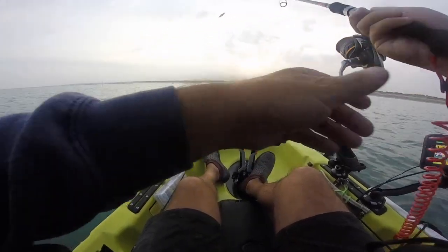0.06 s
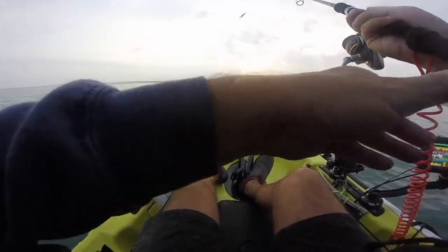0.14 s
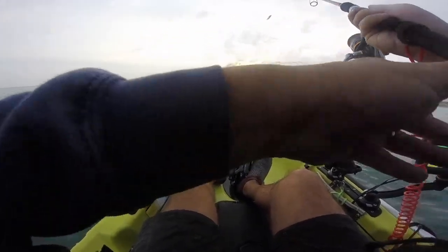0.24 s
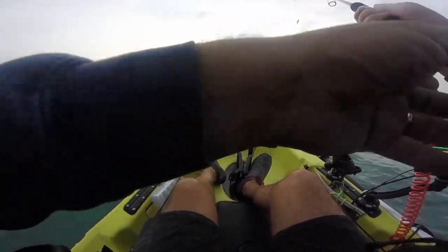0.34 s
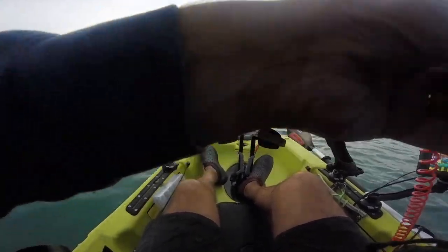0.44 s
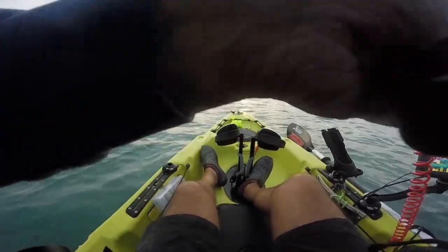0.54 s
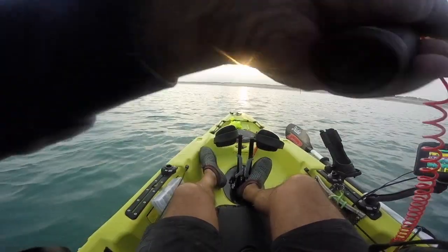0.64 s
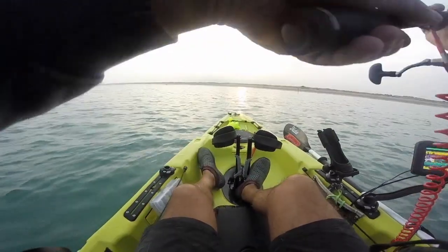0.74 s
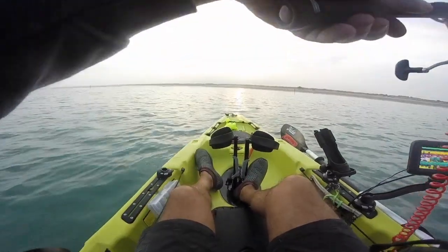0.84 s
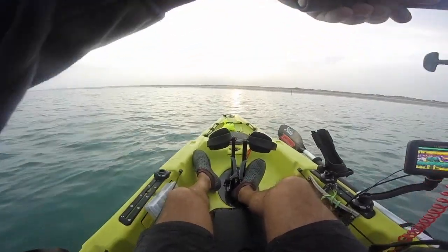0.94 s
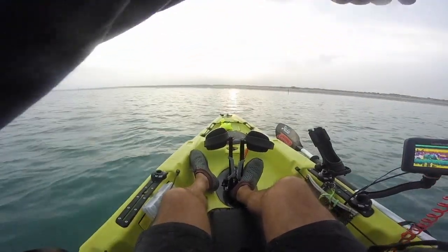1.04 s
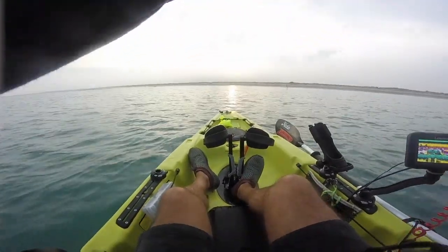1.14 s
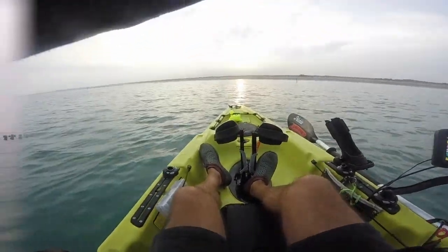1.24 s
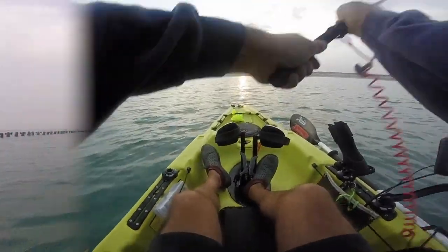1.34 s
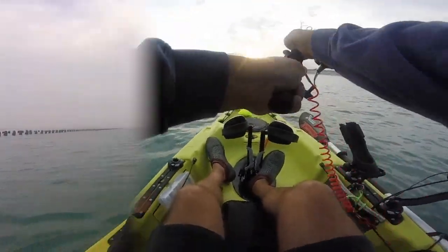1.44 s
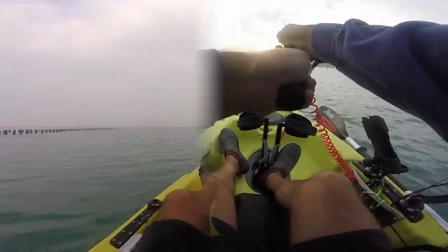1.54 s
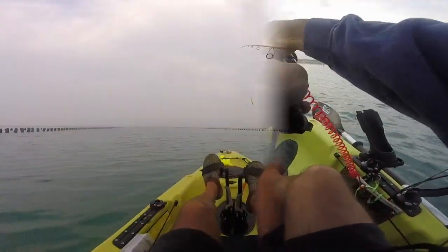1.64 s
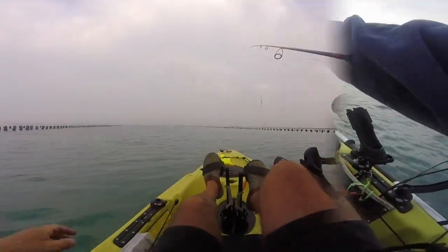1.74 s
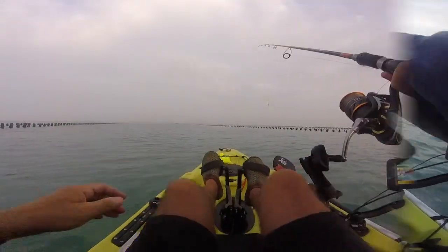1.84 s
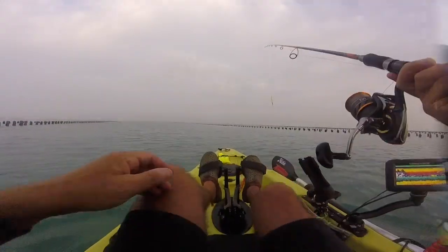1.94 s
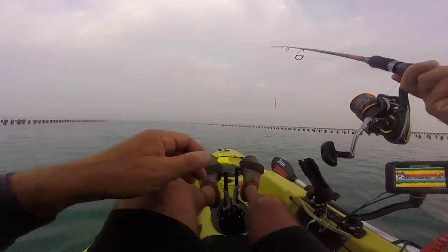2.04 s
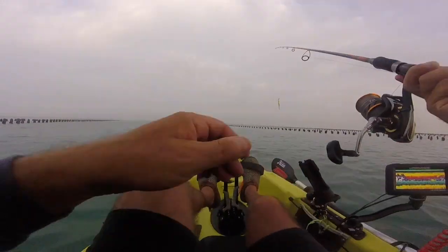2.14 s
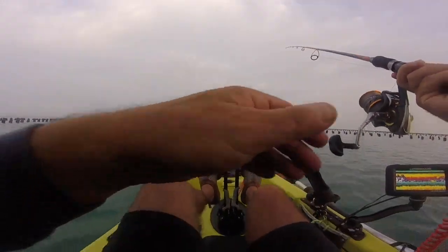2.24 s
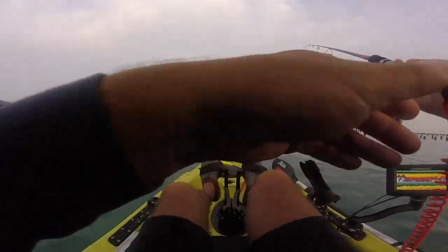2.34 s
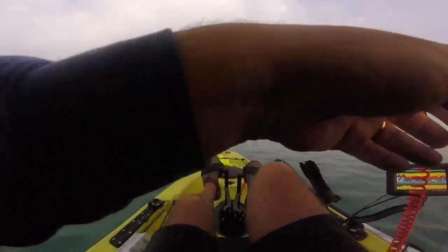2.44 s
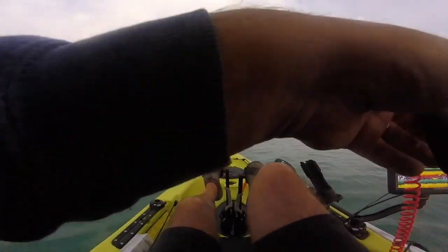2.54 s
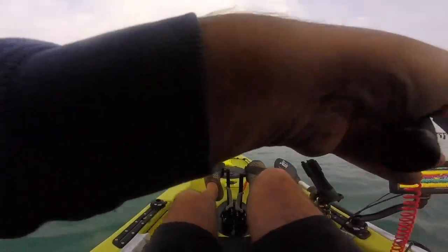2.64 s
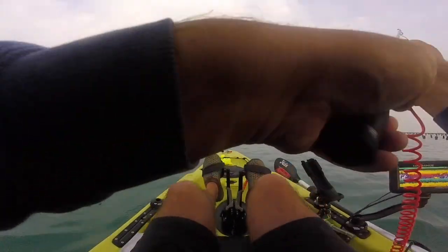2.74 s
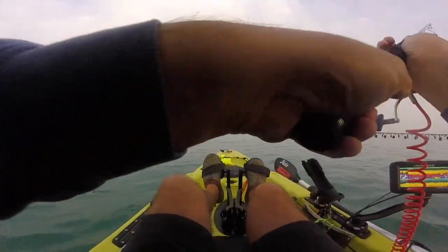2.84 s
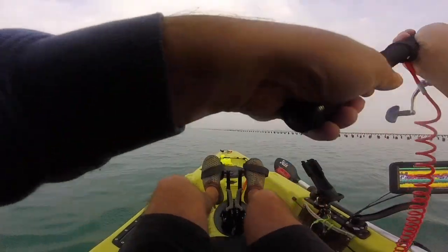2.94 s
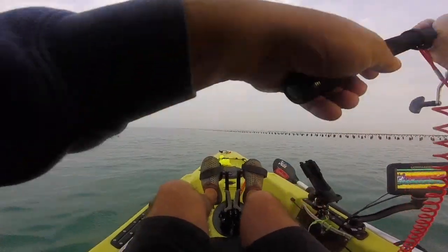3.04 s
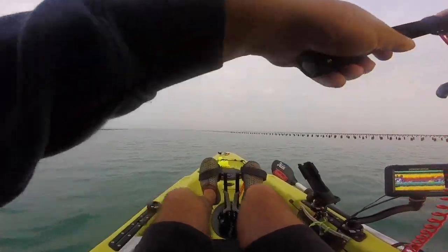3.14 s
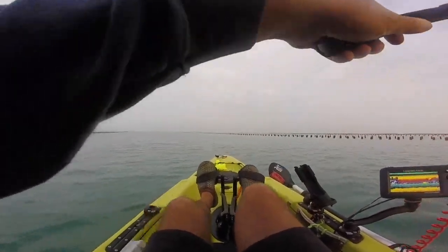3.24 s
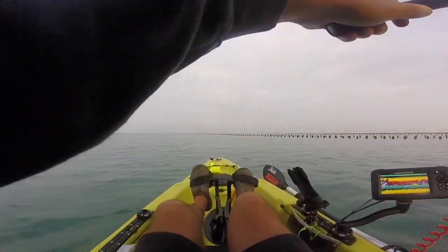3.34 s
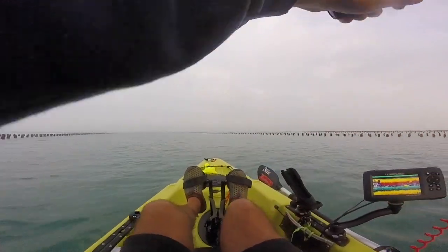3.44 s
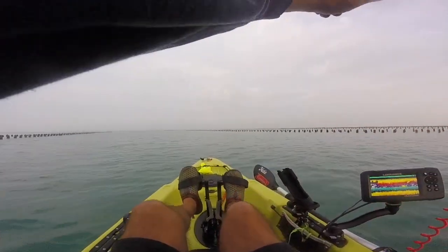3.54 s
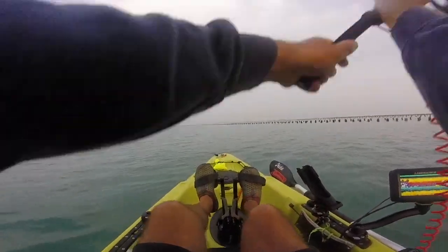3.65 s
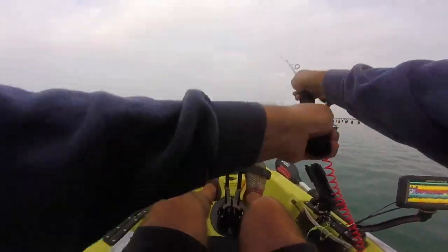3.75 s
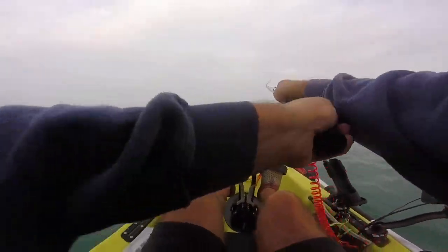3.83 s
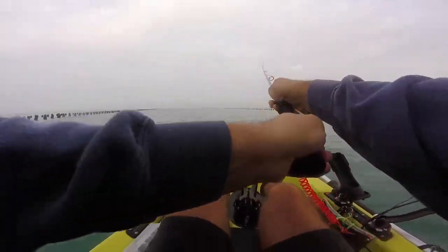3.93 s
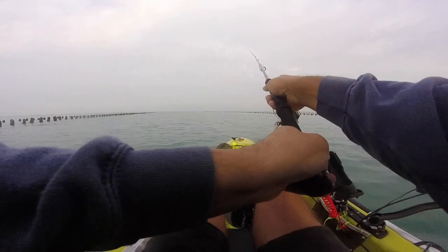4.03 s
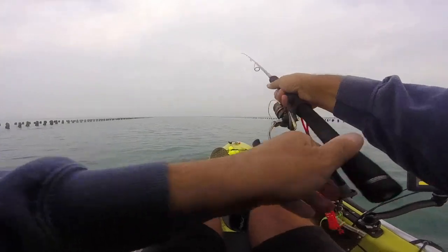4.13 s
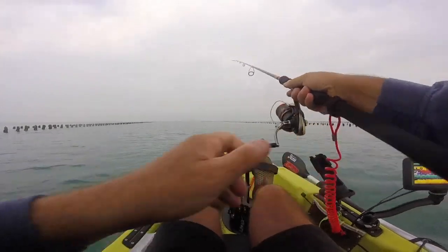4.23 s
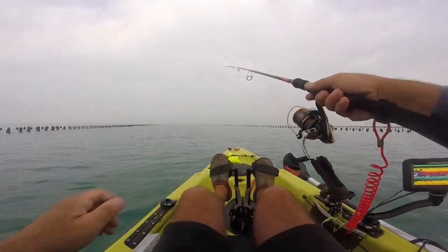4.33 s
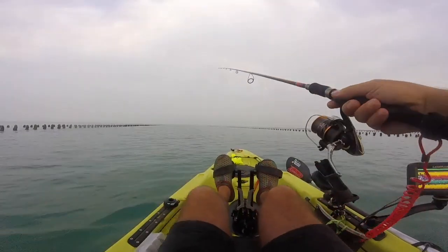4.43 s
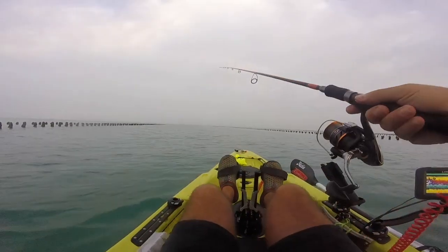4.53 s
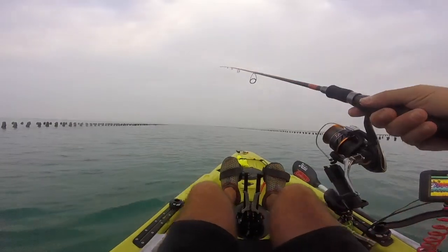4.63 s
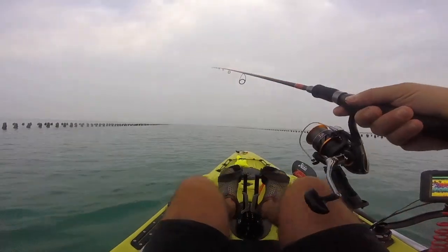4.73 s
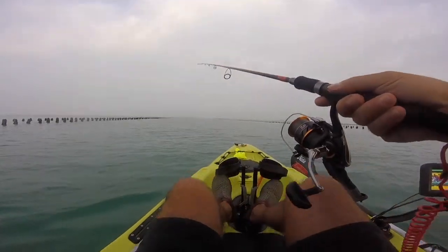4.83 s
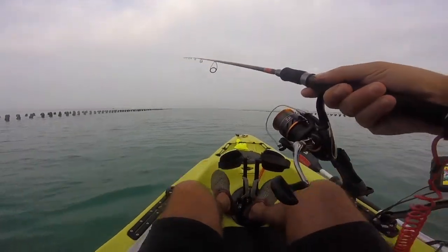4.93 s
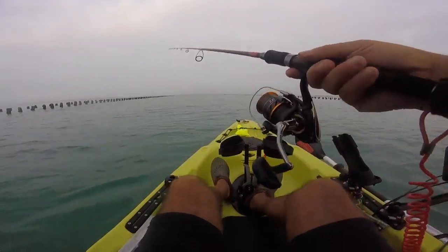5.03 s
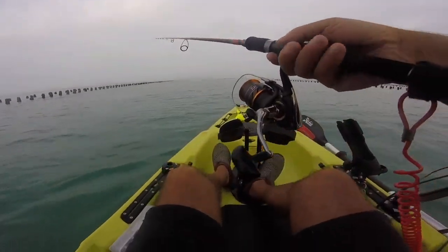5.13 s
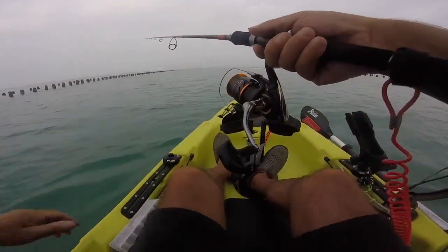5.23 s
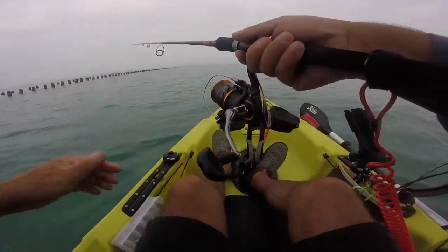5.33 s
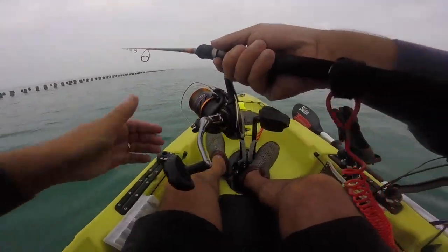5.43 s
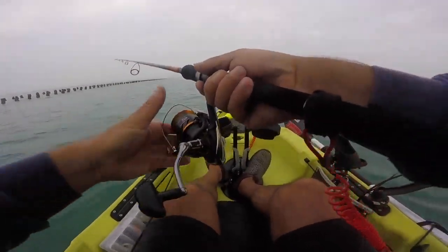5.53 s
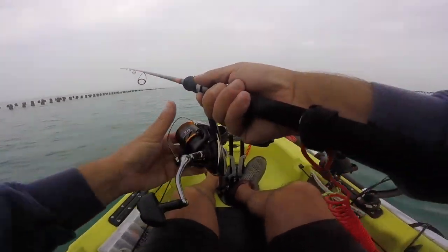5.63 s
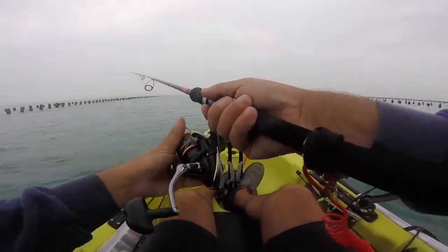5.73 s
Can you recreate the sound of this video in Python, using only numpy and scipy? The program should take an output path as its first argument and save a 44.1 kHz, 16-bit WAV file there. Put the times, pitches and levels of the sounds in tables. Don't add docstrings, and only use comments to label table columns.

```python
import sys
import numpy as np
from scipy import signal
from scipy.fft import rfft, irfft
from scipy.io import wavfile
from scipy.ndimage import uniform_filter1d

SR = 44100
rng = np.random.default_rng(int(sys.argv[2]) if len(sys.argv) > 2 else 0)


def nominal_scale(level):
    x = np.asarray(level, float) / 20
    return 10 ** x


def put_to_file(sound):
    columns = np.atleast_2d(sound).T
    safe = np.clip(columns, -1, 1)
    whole_steps = np.round(safe * 32767)
    wavfile.write(sys.argv[1], SR, whole_steps.astype(np.int16))


N = 254898

# [freq_hz, level_db]
CALM_SPECTRUM = [(11, -43), (18, -2), (65, 0), (226, -9), (366, -8.5), (1210, -14), (1560, -16),
                 (1900, -16), (2450, -30), (2750, -20.5), (5140, -29), (6270, -45), (11700, -39),
                 (14700, -44.5), (16000, -76)]
# [start_s, level_db, pitch_hz (negative swings the other way), length_cycles]
THUMPS = [(.44, -44, 45, 2.4), (1.2755, -20, 141, 2), (1.334, -27, 52, 2.2), (1.358, -20.5, 27.5, 2),
          (1.478, -31.5, 26.5, 1.25), (2.97, -44.5, 36, 0.97), (3.679, -23.5, -53, 0.76),
          (3.7, -20.5, 26.5, 1.5), (3.761, -31.5, -21, 1.5), (3.801, -30, 36, 1.5), (4.24, -37, 22, 1.7),
          (4.855, -39.5, 50.5, 4.3), (5.35, -44.5, 35, 1.7), (5.48, -38.5, -46, 1.4),
          (5.66, -43.5, 39, 1.5)]
# [start_s, end_s, level_db, low_hz, high_hz]
DRAGS = [(0.534, 0.64, -63, 1310, 4370), (0.913, 1.163, -56.5, 1960, 4260), (1.31, 1.37, -48, 453, 1200),
         (1.534, 1.58, -47.5, 1520, 3960), (2.368, 2.578, -51.5, 1410, 1900),
         (2.376, 2.562, -52, 1920, 4000), (3.34, 3.54, -50, 1410, 1870), (3.713, 3.79, -38, 1380, 1880),
         (3.655, 3.724, -46, 510, 1100), (3.655, 3.705, -47, 1360, 4270), (3.93, 4.154, -61.5, 820, 1120),
         (4.182, 4.295, -58.5, 2600, 4560), (4.369, 4.58, -57, 1420, 1820), (4.408, 4.58, -59, 2070, 2780),
         (3.4, 3.643, -58, 554, 1110), (1.1, 1.27, -59, 600, 1200)]
# [start_s, level_db, centre_hz, width_octaves]
TICKS = [(.5636, -51.5, 6510, .72), (0.6794, -51, 6530, 0.95), (.837, -55, 7760, 1.1),
         (0.9786, -54, 7900, .5), (1.0021, -51, 7900, 0.45), (1.0196, -52, 7900, .5),
         (1.0444, -54, 8000, .5), (1.0789, -57, 8300, .5), (1.0914, -61, 7820, .57),
         (1.1069, -42.5, 7900, 0.41), (1.135, -45, 7500, .72), (1.179, -37, 7900, .42),
         (3.7953, -41, 9000, 1.6), (1.4505, -40, 7610, 1.3), (2.3476, -55, 8000, 0.42),
         (2.488, -49, 6520, 0.91), (2.5082, -42.5, 7300, .5), (2.5244, -51, 8060, 0.67),
         (3.4381, -46, 7680, .97), (3.445, -42, 7780, .68), (3.469, -42, 8060, 0.64),
         (3.4974, -48, 7470, 1.1), (3.5215, -40, 7620, .85), (3.6997, -34, 6610, 0.73),
         (3.894, -37.5, 6500, 0.98), (3.9255, -47, 6520, .79), (4.2764, -49.5, 9040, 0.47),
         (4.5202, -47, 6610, 0.81), (5.545, -51.5, 8310, 0.54), (5.712, -48, 6610, 1.2)]
# [start_s, level_db, centre_hz, t60_ms, width_octaves]
SCRAPES = [(1.451, -35, 1160, 60, 0.83), (1.502, -36.5, 4000, 18, 0.83), (1.563, -40.5, 1390, 19, .3),
           (3.693, -17, 2300, 38, 0.75), (3.699, -23.5, 4370, 12, 0.73), (4.795, -38.5, 2740, 11, 0.7),
           (5.3003, -22.5, 3100, 21, 1.04), (5.4625, -32, 1280, 31, 1.3), (4.9252, -50, 6570, 45, .45),
           (5.135, -42, 1990, 97, 0.86), (4.648, -41.5, 3000, 10, .6), (4.755, -47, 2830, 10, .7)]
# [level_db, centre_hz, t60_ms, width_octaves]
LINE_SNAP = [
    (-28.5, 440, 23, 2.2),
    (-19, 1430, 15, 0.36),
    (-16.5, 3240, 13, 1.05),
    (-15.5, 7800, 8.4, 0.62),
    (-31, 11600, 4.5, .5),
    (-32, 22000, 8.8, 0.55),
]
# [pitch_hz, width_hz, level_db]
CASE_MODES = [(1574, 317, 0.5), (1710, 160, -6.5), (2228, 435, 1), (2389, 332, 0.5), (2519, 194, -3),
              (3237, 820, -10.5), (4046, 190, -9)]
# [centre_hz, width_hz]
CASE_NOTCHES = [(1880, 390), (2770, 250)]
# [start_s, level_db, low_ring_db, rattle_ms]
KNOCKS = [(0.5647, -40, -10, 2.5), (0.5985, -42.5, 1, 1.4), (.68, -41.5, -3, 2.2), (.7652, -39, -2, 2.5),
          (1.2201, -24, -32, 1.9), (1.4505, -4, -9.5, 1.43), (1.5644, -29, -18, 1.1),
          (1.6634, -41.5, -11, 2.5), (2.0991, -39.5, -4, 2.3), (2.5088, -35.5, -12, 2.1),
          (2.593, -38, 0, 1.4), (2.7526, -42.5, -10, 1.3), (2.845, -44, -19, 1.2), (3.2916, -45, 1, 1.4),
          (3.4382, -27, 3, 4.3), (3.5243, -23.5, -1, 3.5), (3.7957, 1.1, -12.5, 1.4),
          (3.8027, -19.5, -15, 1.2), (3.804, -25, -27, 2.2), (3.8622, -28, -19, 1.3),
          (3.894, -23, -36, 2.1), (3.936, -29.5, -20, 1.6), (4.521, -31, -11, 3.3), (2.892, -46, -14, 0.61),
          (4.9958, -35.5, -1, 3.7), (5.1299, -33, 2, 1.1), (5.462, -15, -10.5, 1.6),
          (5.5548, -38.5, -10, 2.1), (5.629, -38, -1, 1.4), (5.7104, -39, -26, 5)]
# [freq_hz, level_db]
RUB_SPECTRUM = [(240, -59), (400, -8), (1110, -67), (1510, -3.5), (1900, 14), (2260, -15), (2580, -7.5),
                (2910, 12), (5500, -10.5), (7150, -37.5), (12100, -120)]
# [freq_hz, level_db]
HISS_SPECTRUM = [(3000, -30), (4200, -8), (5150, -9.5), (5700, -4), (6420, -5), (7100, -10), (8400, -8.5),
                 (9800, -14), (14700, -29), (15700, -40), (16000, -62)]
# [time_s, effort_db, rod_speed_db, lurch_db over rest]
FIRST_CAST = [
    (.84, -56.5, -71, -2),
    (1.03, -48, -65, 4.5),
    (1.15, -44, -58.5, 6.5),
    (1.22, -35, -47.5, 10),
    (1.35, -31.5, -52, 15),
    (1.38, -39.5, -57.5, 12),
    (1.44, -34, -51, 12.5),
    (1.49, -44.5, -65, 7),
    (1.52, -56, -69, -4),
]
REACH = [
    (1.45, -50, -62, 4),
    (1.6, -53, -67, 6.5),
    (1.7, -63.5, -78, -16),
    (2.15, -60.5, -68, -7),
    (2.4, -60.5, -69, 0),
    (2.7, -65, -70, 0.5),
    (2.9, -62.5, -70, -10),
]
SECOND_CAST = [
    (3.25, -60.5, -72.5, 3),
    (3.41, -43.5, -58.5, 7),
    (3.51, -41, -52.5, 11.5),
    (3.64, -35.5, -52, 11.5),
    (3.691, -27.5, -45.5, 20),
    (3.74, -39, -57, 11.5),
    (3.77, -32.5, -44.5, 16.5),
    (3.81, -41, -54, 13),
    (3.959, -43, -64, 8),
]
ROD_DOWN = [
    (3.89, -45.5, -62, 5),
    (4.11, -48, -62, 5),
    (4.25, -47.5, -63.5, 9),
    (4.38, -51, -67.5, 5),
    (4.49, -49, -65.5, 7.5),
    (4.54, -53.5, -66, 4),
    (4.7, -65, -68, -0.5),
    (5.2, -57.5, -68, 1.5),
    (5.78, -58.5, -68, -1),
]

REST_DB = -63.5, -70, -0.5
CALM_DB = -56.5
BODY_DB, SWAY_DB = -58, -56
SWAY_SLOPE, SWAY_GUST_DB = 0.97, 1
DRAG_EDGE_MS = 19
TICK_T60_MS = 9.7
LINE_S = 1.2762
HIGH_RING_DB, HIGH_RING_SLOPE = -24.5, -0.27
KNOCK_NOTCH = 0.8


def curve(column):
    t = np.arange(N) / SR
    moves = []
    for table in (FIRST_CAST, REACH, SECOND_CAST, ROD_DOWN):
        move = np.array(table)
        moves.append(np.interp(t, move[:, 0], move[:, column], -99, -99))
    return np.maximum(np.max(moves, axis=0), REST_DB[column - 1])


def unit(x):
    return x / np.sqrt(np.mean(x ** 2))


def colour(x, points):
    hz, db = np.transpose(points)
    f = np.maximum(np.fft.rfftfreq(len(x), 1 / SR), 1)
    gain = nominal_scale(np.interp(np.log(f), np.log(hz), db))
    return unit(irfft(rfft(x) * gain, len(x)))


def resonance(x, hz, width_hz):
    b, a = signal.iirpeak(min(hz, 0.45 * SR), hz / width_hz, fs=SR)
    return signal.lfilter(b, a, x)


def steep_resonance(x, hz, width_hz):
    return resonance(resonance(x, hz, width_hz), hz, width_hz)


def bandpass(x, order, edges_hz):
    return signal.sosfilt(signal.butter(order, edges_hz, "band", fs=SR, output="sos"), x)


def walk(rate):
    hold = int(SR / rate)
    steps = np.repeat(rng.standard_normal(N // hold + 1), hold)
    slewed = uniform_filter1d(uniform_filter1d(steps, hold), hold)
    return unit(slewed[:N])


def add(out, s, x, db):
    i = int(s * SR)
    out[i:i + len(x)] += (nominal_scale(db) * x / np.max(np.abs(x)))[:N - i]


def grains(per_s, spread_db):
    hits = rng.random(N) < per_s / SR
    size = np.minimum(rng.exponential(1, N), 5)
    return unit(hits * rng.standard_normal(N) * nominal_scale(spread_db * size))


def case(x, low_db=0., high_db=0., notch=0.31):
    group_db = [low_db] * 2 + [0] * 3 + [high_db] * 2
    rings = 0
    for extra_db, (hz, width_hz, db) in zip(group_db, CASE_MODES):
        rings = rings + nominal_scale(db + extra_db) * steep_resonance(x, hz, width_hz)
    for hz, width_hz in CASE_NOTCHES:
        rings = rings - min(notch, 1) * resonance(rings, hz, width_hz)
    return bandpass(rings, 4, [1150, 4400])


def calm():
    return nominal_scale(CALM_DB) * colour(rng.standard_normal(N), CALM_SPECTRUM)


def rumble():
    lurch_db = curve(3)
    body = steep_resonance(rng.standard_normal(N), 175, 220) * nominal_scale(1.67 * walk(22))
    sway = steep_resonance(rng.standard_normal(N), 38, 75) * nominal_scale(SWAY_GUST_DB * walk(9))
    return nominal_scale(BODY_DB + lurch_db) * unit(body) + nominal_scale(SWAY_DB + SWAY_SLOPE * lurch_db) * unit(sway)


def thumps():
    out, t = np.zeros(N), np.arange(SR // 5) / SR
    for s, db, hz, cycles in THUMPS:
        fade = np.exp(-(abs(hz) * t / cycles * 2) ** 2)
        add(out, s, np.sin(2 * np.pi * hz * t) * fade, db)
    return out


def drags():
    out, t = np.zeros(N), np.arange(N) / SR
    friction = grains(12000, 0.51)
    ring = unit(case(friction, 5.2, notch=0.16)) * nominal_scale(7.0 * walk(44))
    friction = friction + nominal_scale(-12) * ring
    for start, end, db, low_hz, high_hz in DRAGS:
        inside_ms = np.minimum(t - start, end - t) * 1000
        gate = np.clip(inside_ms / DRAG_EDGE_MS + 0.5, 0, 1)
        out += nominal_scale(db) * gate * unit(bandpass(friction, 3, [low_hz, high_hz]))
    return out


def bursts(table):
    out, t = np.zeros(N), np.arange(2048) / SR
    for s, db, hz, t60_ms, octaves in table:
        fade = np.minimum(t / 0.0014, 1) * nominal_scale(-60 * t * 1000 / t60_ms)
        burst = rng.standard_normal(2048) * fade
        edges_hz = np.minimum(hz * 2. ** (np.array([-0.5, 0.5]) * octaves), 0.45 * SR)
        add(out, s - 0.0004, bandpass(burst, 2, edges_hz), db)
    return out


def ticks():
    return bursts([(s, db, hz, TICK_T60_MS, octaves) for s, db, hz, octaves in TICKS])


def scrapes():
    return bursts(SCRAPES)


def line_snap():
    return bursts([(LINE_S, *layer) for layer in LINE_SNAP])


def knocks():
    out, t = np.zeros(N), np.arange(1024) / SR
    push = (t < 0.0008) * np.sin(np.pi * t / 0.0008) * np.sin(2 * np.pi * 2300 * t)
    for s, db, low_db, rattle_ms in KNOCKS:
        fade = np.minimum(t / 0.00058, 1) * np.exp(-t * 1000 / rattle_ms)
        rattle = rng.standard_normal(1024) * fade
        high_db = HIGH_RING_DB + HIGH_RING_SLOPE * db
        knock = case(push + 0.86 * rattle, low_db + 10, high_db + 22.5, KNOCK_NOTCH)
        add(out, s - 0.0004, knock, db)
    return out


def rub():
    surge = nominal_scale(1.5 * walk(45) + 0.95 * walk(12))
    slips = grains(6000, 1.96) * surge
    low_db, high_db = 1.8 * walk(11), 4.5 * walk(7.6)
    ring = unit(case(slips, low_db, high_db, notch=0.17))
    broad = colour(grains(6000, 0.78) * surge, RUB_SPECTRUM)
    cloth = unit(ring + nominal_scale(-9) * broad)
    air = unit(0.071 * slips + rng.standard_normal(N) * nominal_scale(0.89 * walk(30)))
    return nominal_scale(curve(1)) * cloth + nominal_scale(curve(2) - 2.0) * colour(air, HISS_SPECTRUM)


def scene():
    background = calm() + rumble() + thumps()
    gear = drags() + ticks() + scrapes() + line_snap()
    return (background + gear + knocks() + rub())[None]


def top_cut(x):
    return signal.sosfilt(signal.butter(12, 16500, fs=SR, output="sos"), x)


def record(dry):
    low_pass = signal.ellip(6, 0.3, 30, 15200, fs=SR, output="sos")
    cut = signal.sosfilt(low_pass, np.clip(dry, -1, 1))
    return top_cut(np.clip(cut, -1, 1))


dry = scene()
out = record(dry)
put_to_file(out)
```